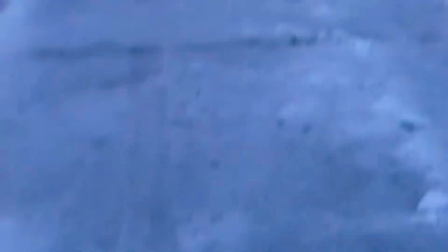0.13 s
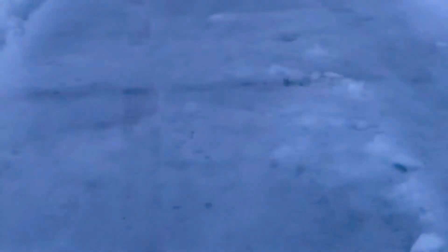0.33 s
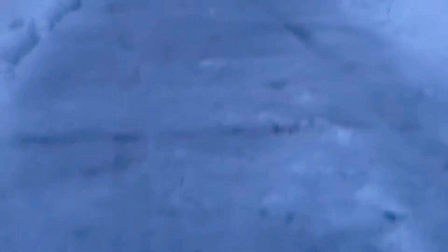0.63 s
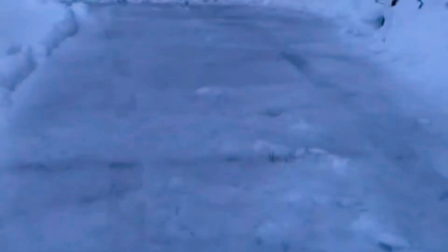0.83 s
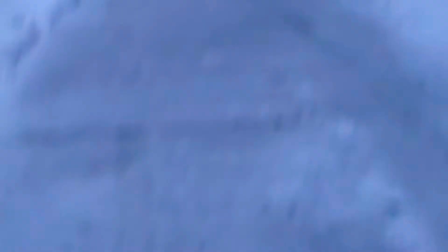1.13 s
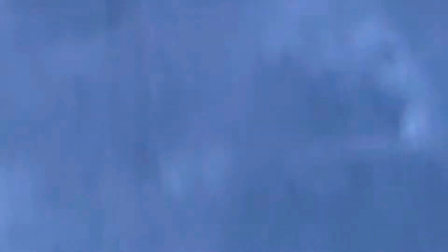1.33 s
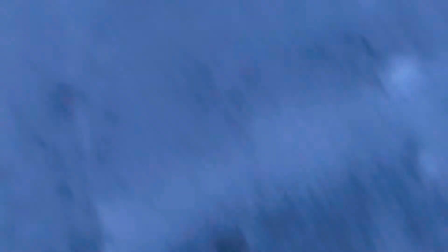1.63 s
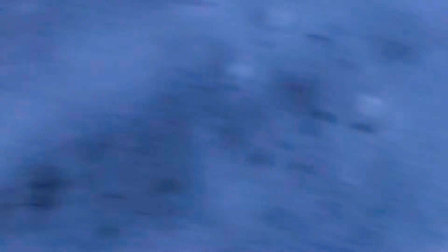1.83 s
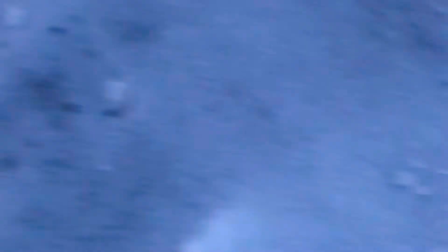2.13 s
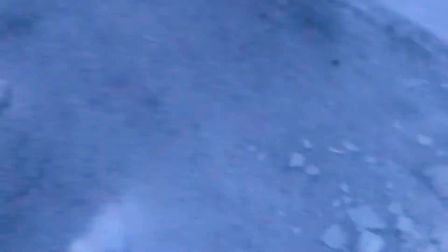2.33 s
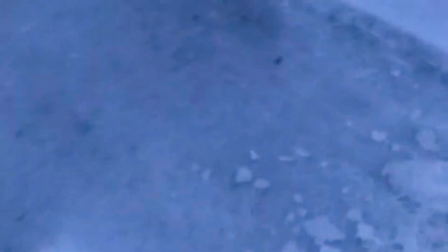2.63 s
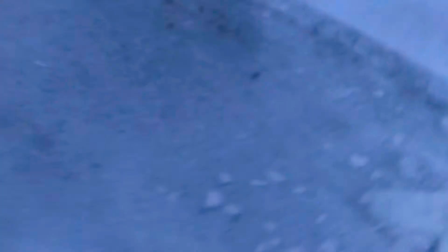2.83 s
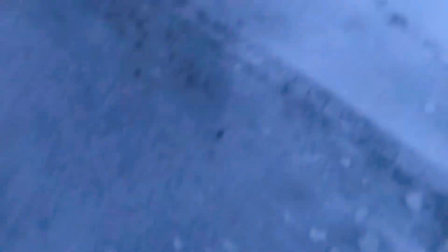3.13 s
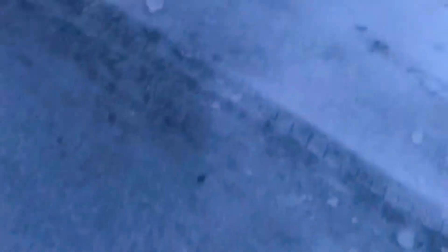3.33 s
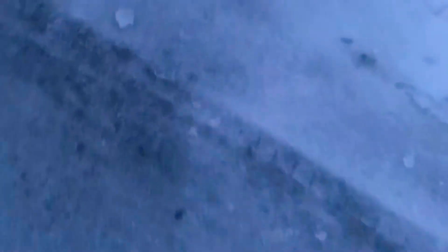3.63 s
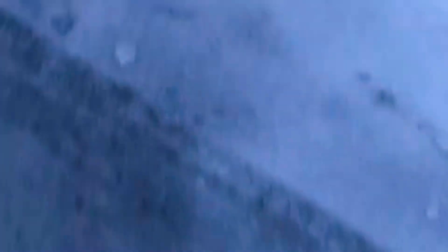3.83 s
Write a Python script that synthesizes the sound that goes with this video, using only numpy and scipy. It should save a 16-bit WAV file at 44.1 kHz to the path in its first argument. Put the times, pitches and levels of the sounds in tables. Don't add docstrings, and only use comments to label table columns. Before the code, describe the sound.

Footsteps cracking crusted ice outdoors, growing louder, over faint hiss and distant bird chatter

```python
import sys
import numpy as np
from scipy import signal
from scipy.fft import rfft, irfft
from scipy.io import wavfile
from scipy.ndimage import uniform_filter1d, map_coordinates

SR = 44100
rng = np.random.default_rng(int(sys.argv[2]) if len(sys.argv) > 2 else 0)


def gain_from_db(level_db):
    decades = np.asarray(level_db, float) / 20
    return 10 ** decades


def transcribe(signal):
    frames = np.atleast_2d(signal).T
    limited = np.clip(frames, -1, 1)
    pcm = np.round(limited * 32767).astype(np.int16)
    wavfile.write(sys.argv[1], SR, pcm)


N = 176400
SIZE = 1024
LAG_S = 0.003684


def unit(x):
    return x / np.sqrt(np.mean(x ** 2) + 1e-20)


def along(points, hz):
    f, v = np.transpose(points)
    return np.interp(np.log(hz + 1), np.log(f + 1), v)


def rush(spectrum, patchy_db, bins, frames):
    hz, _, z = signal.stft(rng.standard_normal(N), SR, nperseg=1024)
    field = uniform_filter1d(rng.standard_normal(z.shape), bins, 0)
    field = uniform_filter1d(field, frames, 1)
    gain_db = patchy_db * unit(field) + along(spectrum, hz)[:, None]
    return unit(signal.istft(z * gain_from_db(gain_db), nperseg=1024)[1][:N])


def echoes(x, t60):
    t = np.arange(SR // 3) / SR
    tail = rng.standard_normal(len(t)) * gain_from_db(-60 * t / t60)
    return signal.fftconvolve(x, tail / np.linalg.norm(tail))[:N]


def background():
    # frequency in Hz, density in dB per Hz.
    air_colour = [(200, -2.5), (500, -3.5), (1000, -2), (2500, -6), (5000, -8.5), (8000, -14.5),
                  (16000, -24)]
    hum_colour = [(30, -54.5), (45, -10), (70, -2.5), (150, -5.5), (300, -11), (600, -24.5), (1200, -52)]
    chatter_colour = [(2600, -54), (2950, -17.5), (3150, -5), (4200, -5), (5200, -12), (6500, -39.5)]
    # time in seconds, gain in dB.
    gain_points = [
        (0, -1.5),
        (.25, -6.5),
        (.9, -6.5),
        (1.15, -6),
        (1.4, 1),
        (2.1, 2.5),
        (3.2, 8.5),
        (3.4, -2),
        (3.65, 4),
        (4, 9),
    ]
    gain_db = np.interp(np.arange(N) / SR, *np.transpose(gain_points))
    air = gain_from_db(-62.5 + gain_db) * rush(air_colour, 2.5, 14, 3)
    hum = gain_from_db(-65 + 0.15 * gain_db) * rush(hum_colour, 1.5, 3, 5)
    chatter = gain_from_db(-68.5 + 0.18 * gain_db) * rush(chatter_colour, 3.9, 12, 5)
    return air + hum + chatter


def birds():
    # start in seconds, length in seconds, first and last pitch in Hz, level in dB.
    calls = [
        (0.817, 0.039, 5740, 7250, -69),
        (0.852, 0.031, 5700, 7780, -61.5),
        (0.615, 0.057, 4090, 3800, -68.5),
        (1.27, 0.038, 4300, 3307, -69),
        (1.306, 0.036, 3800, 2990, -65.5),
        (1.553, 0.076, 5190, 5100, -70.5),
        (2.109, 0.053, 2960, 3410, -66),
        (3.088, .04, 4300, 3936, -69),
        (3.153, 0.029, 3600, 3210, -62.5),
    ]
    flock = []
    for a, b, c, d in rng.uniform(size=(70, 4)):
        rise_hz = 1900 * c ** 2
        flock.append((a * 3.9, 0.088 * b + 0.018, 3100 + rise_hz, 3100 + rise_hz * d, -81))
    out = np.zeros(N)
    for s, length, from_hz, to_hz, db in list(calls) + flock:
        u = np.linspace(0, 1, int(length * SR))
        waver = uniform_filter1d(rng.standard_normal(len(u)), size=90)
        pitch = from_hz + (to_hz - from_hz) * u + 75 * unit(waver)
        whistle = np.sin(np.pi * u) ** 0.57 * np.sin(2 * np.pi * np.cumsum(pitch) / SR)
        out[round(s * SR):][:len(u)] += gain_from_db(db + 6.5) * whistle
    return out + gain_from_db(-2) * echoes(out, 0.23)


def thuds():
    # time of the peak in seconds, level in dB.
    heels = [
        (1.66, -61),
        (1.9, -51.5),
        (2.955, -50),
    ]
    t = np.arange(N) / SR
    out = np.zeros(N)
    for s, db in heels:
        out += gain_from_db(db) * np.sin(2 * np.pi * 62 * (t - s)) * np.exp(-((t - s) / 0.022) ** 2)
    return out


def tinkles():
    bounces = [
        3.13,
        3.155,
        3.195,
        3.235,
    ]
    out, t = np.zeros(N), np.arange(SIZE // 2) / SR
    for s in bounces:
        ring_hz = 10500 * rng.normal(1, 0.03)
        out[round(s * SR):][:len(t)] += gain_from_db(-51 - 60 * t / 0.012) * np.sin(2 * np.pi * ring_hz * t)
    return out


def breaks(s, db, tone_hz, snap_db, lag_s):
    # frequency in Hz, density in dB per Hz.
    snap_colour = [(1180, -7.5), (2000, -5), (3040, -3.5), (5880, -9.5), (6700, -10), (10600, -21.5),
                   (16000, -21.5)]
    tone_octaves, crust_low_hz, snap_decay_s = 0.83, 144.9, 0.0007
    hz, t = np.fft.rfftfreq(SIZE, 1 / SR) + 1, np.arange(SIZE) / SR

    off = np.log2(hz / tone_hz[:, None]) / tone_octaves
    bass_slope = 0.36 + 0.75 * gain_from_db(2 * db)[:, None]
    radiation = hz ** 2 / (hz ** 2 + crust_low_hz ** 2)
    band = radiation / (1 + off ** 2) ** np.where(off > 0, 1.7, bass_slope)
    band = band * (1 + 0.67 / (1 + (off / 0.31) ** 2))
    phase = 4 * np.pi * lag_s[:, None] * (np.sqrt(1000 * hz) - hz / 8)
    wave = irfft(band * np.exp(-1j * phase), SIZE) * (t < t[-SIZE // 8])

    noise = rng.standard_normal((len(s), SIZE)) * np.sqrt(t) * np.exp(-t / snap_decay_s)
    shard = np.log2(hz / 5000) - 1.1 * rng.uniform(-0.41, 1, (len(s), 1))
    colour_db = 5 / (1 + (shard / 0.48) ** 2) + along([(500, -46.5)] + list(snap_colour), hz)
    delay = np.exp(-2j * np.pi * hz * 0.3 * lag_s[:, None])
    snap = irfft(rfft(noise) * delay * gain_from_db(colour_db), SIZE) * (t < t[SIZE // 2])

    wave = wave / np.abs(wave).max(axis=1, keepdims=True)
    snap = snap / np.abs(snap).max(axis=1, keepdims=True)
    both = gain_from_db(db)[:, None] * (wave + gain_from_db(snap_db)[:, None] * snap)
    at = np.round((s + 0.0006) * SR).astype(int)[:, None] + np.arange(SIZE)
    return np.bincount(at.ravel(), both.ravel(), N + SR)[:N]


def grinding():
    # start in seconds, length in seconds, level in dB, snap over it in dB.
    presses = [(0.087, 0.036, -46, -5), (0.406, 0.026, -59.5, 4.5), (1.621, 0.088, -53.5, -3),
               (1.863, 0.081, -46.5, -0.5), (1.201, 0.72, -78.5, 6), (2.302, 0.16, -42.5, -3.5),
               (2.488, 0.015, -33, 4), (2.521, 0.14, -55.5, 4), (2.634, 0.048, -42.5, -11.5),
               (2.67, 0.19, -46.5, -2), (2.854, 0.11, -49, 5.5), (2.943, 0.05, -32.5, -3.5),
               (2.979, 0.108, -32.5, -6), (3.013, 0.012, -33.5, 5.5), (3.082, 0.28, -57.5, -1),
               (3.507, .017, -33, -4.5), (3.532, 0.026, -35.5, -18), (3.571, 0.046, -44, -13),
               (3.706, 0.085, -37, -10), (3.795, 0.049, -32.5, -8), (3.864, 0.06, -40.5, 0.5),
               (3.918, 0.038, -46.5, -1), (3.984, 0.013, -46, -32)]
    count, grains_per_s, clumps_per_s = 6000, 1100, 130
    s = np.cumsum(rng.exponential(1, count)) / grains_per_s
    size = np.minimum(rng.exponential(1, count), 3)
    tone = np.maximum(rng.standard_normal(count), -1.7)
    way = rng.uniform(0.2, 0.7005, count)

    start, length, db, snap_db = np.transpose(presses)[:, :, None]
    u = (s - start) / length
    press = gain_from_db(db) * np.clip(np.minimum(u / 0.22, (1 - u) * 1.86), 0, 1) ** 0.4
    press = press * gain_from_db(2.5 * map_coordinates(rng.standard_normal(SIZE), [s * clumps_per_s]))

    on = (press.sum(0) > 0) & (s < N / SR)
    total = press.sum(0)[on]
    bright_db = 20 * np.log10((press * gain_from_db(snap_db)).sum(0)[on] / total)
    bright_db = bright_db + 2 + 5 * rng.standard_normal(count)[on]
    level_db = 20 * np.log10(total) - 7.5 + 3.5 * size[on]
    tone_hz = 920 * 2 ** (0.55 * tone[on])
    return breaks(s[on], level_db, tone_hz, bright_db, LAG_S * way[on])


def cracks():
    # time in seconds, peak level in dB, crust tone in Hz, snap over
    # it in dB.
    early_breaks = [(0.041, -38, 1830, 9), (0.1, -25.5, 2310, -34), (0.103, -28.5, 730, -2),
                    (0.15, -37, 2250, -16), (0.27, -25.5, 1450, 1), (0.465, -40, 1030, -4),
                    (0.509, -40, 694, 0), (1.183, -42, 1110, -11), (1.634, -21, 820, -19),
                    (1.667, -29, 960, -6), (1.782, -30, 1470, -11.5), (1.843, -24.5, 1510, -5),
                    (1.869, -21.5, 1006, -14), (1.877, -20.5, 1040, -7.5), (1.892, -18.5, 1060, -11),
                    (1.913, -26.5, 1160, -3.5), (2.224, -28, 890, -9), (2.275, -28, 960, -16)]
    middle_breaks = [(2.32, -28.5, 780, -8), (2.327, -18.5, 620, -11), (2.337, -19.5, 1040, -6),
                     (2.359, -30, 576, -18), (2.37, -23.5, 546, -11), (2.394, -22.5, 708, -13),
                     (2.41, -25.5, 633, -19), (2.434, -23.5, 799, -3), (2.492, -20.5, 781, -5),
                     (2.587, -22.5, 1440, -10.5), (2.66, -18.5, 1420, -5.5), (2.675, -17.5, 2140, -2),
                     (2.866, -30, 751, -12.5), (2.877, -25.5, 713, -13), (2.924, -20.5, 1840, -13),
                     (2.933, -19.5, 1000, -12.5), (2.949, 0.5, 730, -26.5), (2.992, -18, 850, -15),
                     (3.011, -14.5, 775, -16), (3.028, -14.5, 1150, -15.5), (3.113, -28, 1310, -15),
                     (3.424, -35.5, 1350, 3)]
    late_breaks = [(3.515, -22.5, 637, -14.5), (3.537, -18.5, 1190, -12.5), (3.542, -18.5, 1338, -17),
                   (3.585, -14.5, 1060, -11.5), (3.615, -24, 970, -16), (3.695, -17, 1095, -27),
                   (3.724, -25, 1000, -12), (3.74, -20, 1170, -10), (3.787, -16.5, 2000, -17),
                   (3.799, -5, 694, -25), (3.804, -10.5, 890, -23), (3.813, -14, 870, -30),
                   (3.82, -6, 1142, -14.5), (3.83, -9.5, 1100, -22.5), (3.84, -11, 1220, -21),
                   (3.852, -19, 1480, -13), (3.89, -15.5, 850, -20.5), (3.906, -16.5, 1050, -23),
                   (3.962, -27, 1044, -38), (3.989, -13, 1170, -31)]
    earlier_chips = [(1.626, -32, 2000, -1.5), (1.827, -38, 2500, -16), (1.851, -39, 2785, -5),
                     (1.857, -34, 2500, -1), (1.874, -20.5, 1000, -3), (1.883, -24, 1000, -7),
                     (1.889, -27.5, 2000, 0), (1.906, -29.5, 1000, 5), (1.925, -39, 1200, -7),
                     (1.931, -32, 1410, -11), (2.342, -23, 800, 4), (2.347, -28, 701, -12),
                     (2.399, -25, 700, 3), (2.452, -32.5, 900, -9), (2.46, -27.5, 794, -7),
                     (2.474, -31.5, 799, -18), (2.484, -37, 7000, -12), (2.496, -27, 1500, 5),
                     (2.497, -22, 6860, -36), (2.661, -22.5, 3450, -20), (2.663, -24, 4500, -20),
                     (2.641, -35, 840, -8), (2.662, -18.5, 410, -5), (2.699, -35, 1190, -5),
                     (2.721, -38, 600, -12), (2.746, -34, 770, -14), (2.775, -29, 1090, -8),
                     (2.821, -33, 795, -11), (2.848, -29.5, 770, -9), (2.958, -19.5, 905, -2),
                     (2.972, -21, 1590, -14), (2.977, -23.5, 1250, -15), (3, -17.5, 900, -12),
                     (3.018, -20, 1499, -12), (3.036, -19.5, 1510, -18), (3.049, -24.5, 994, -10),
                     (3.059, -26.5, 1199, -20), (3.075, -30.5, 1110, -6)]
    later_chips = [(3.507, -27, 1316, -8), (3.511, -25, 1296, -6), (3.529, -32, 1092, -9),
                   (3.552, -26, 1000, -6), (3.565, -34.5, 1500, 0), (3.576, -31, 1300, -6),
                   (3.582, -23, 1100, -10), (3.59, -26.5, 1295, -10), (3.606, -33.5, 1000, -9),
                   (3.71, -28.5, 1100, -20), (3.756, -23.5, 1100, -12.5), (3.796, -20, 1200, -7),
                   (3.836, -14, 1400, -19), (3.844, -15, 1190, -19), (3.821, -15, 3000, -14),
                   (3.586, -22.5, 3000, -32), (3.866, -27, 2500, 1), (3.875, -25.5, 1250, -11),
                   (3.886, -24.5, 1292, -3), (3.902, -21.5, 1200, -6.5), (3.368, -44.5, 3003, 2)]
    rows = list(early_breaks) + list(middle_breaks) + list(late_breaks) + list(earlier_chips) + list(later_chips)
    s, db, tone_hz, snap_db = np.transpose(rows)
    snap_db = snap_db + 11
    lag_s = LAG_S * gain_from_db(db * 0.1504)
    tone_db = db - 20 * np.log10(1 + gain_from_db(snap_db + 2.5))
    return breaks(s, tone_db, tone_hz, snap_db, lag_s)


def scene():
    ice = cracks() + grinding() + tinkles()
    ice = ice + gain_from_db(-8.5) * echoes(ice, 0.05)
    return (background() + birds() + thuds() + ice)[None]


def roll_off(x):
    return signal.sosfilt(signal.butter(12, 16990, fs=SR, output="sos"), x)


def record(dry):
    hz = np.fft.rfftfreq(N, 1 / SR)
    mix = irfft(rfft(dry) * np.where(hz < 15900, 1, gain_from_db(-29)), N)
    return roll_off(mix)


dry = scene()
out = record(dry)
transcribe(out)
```